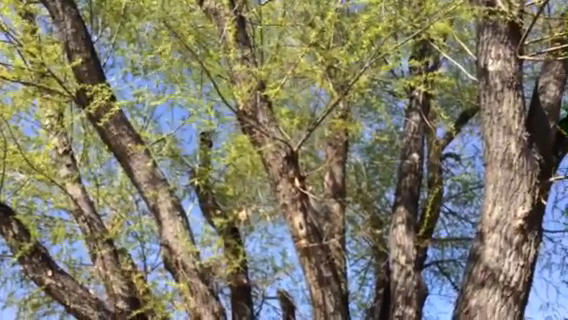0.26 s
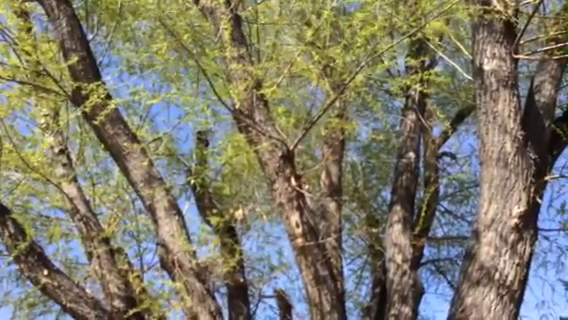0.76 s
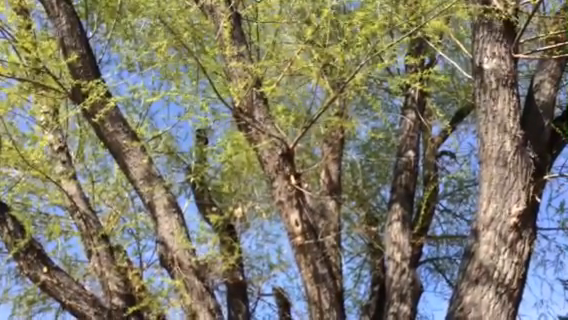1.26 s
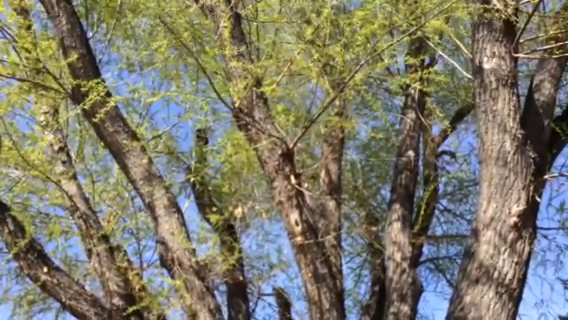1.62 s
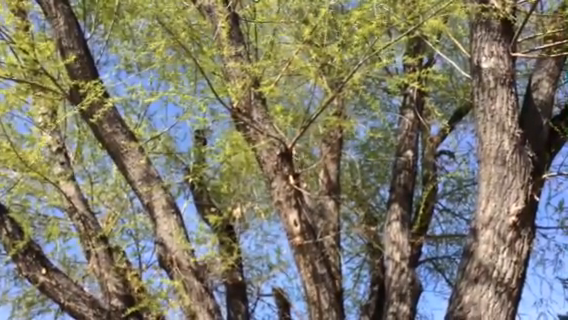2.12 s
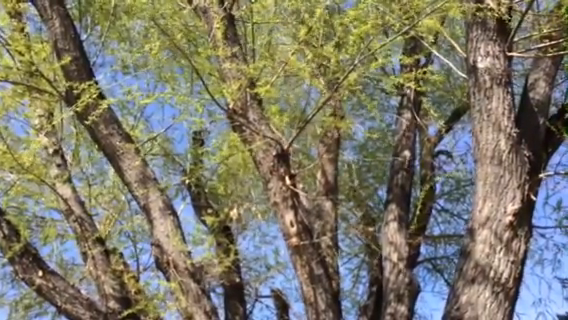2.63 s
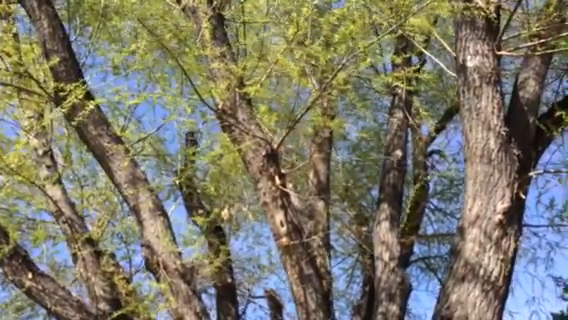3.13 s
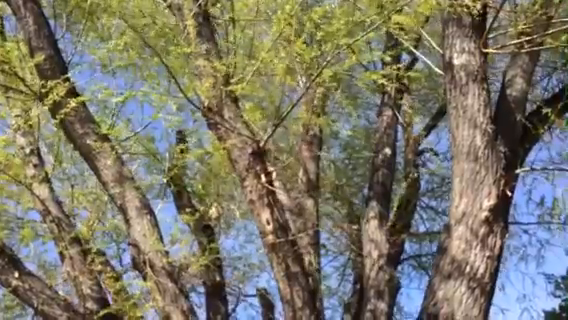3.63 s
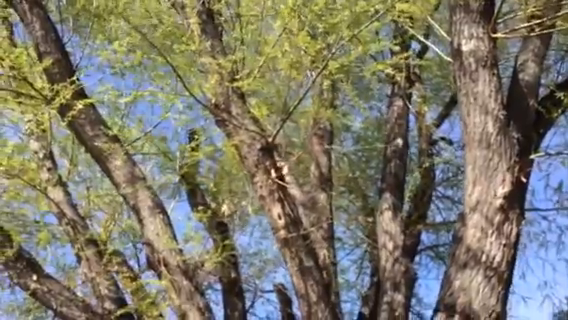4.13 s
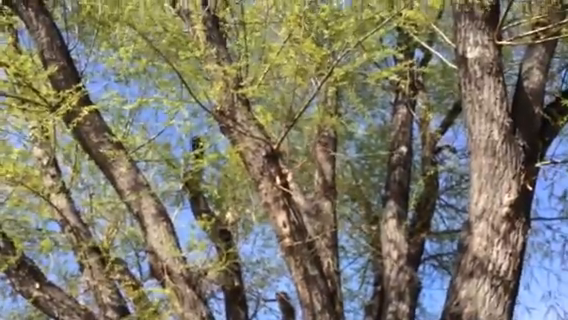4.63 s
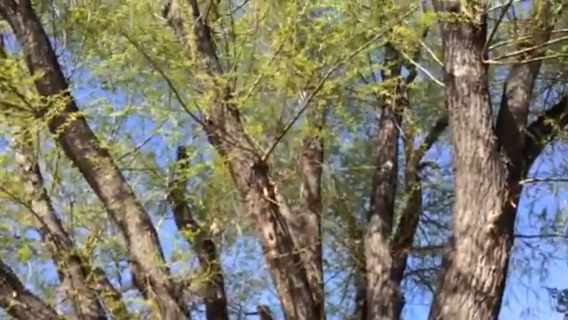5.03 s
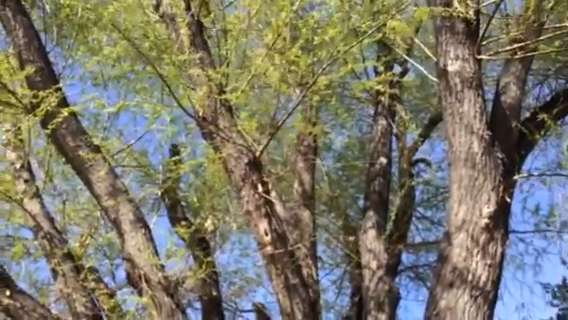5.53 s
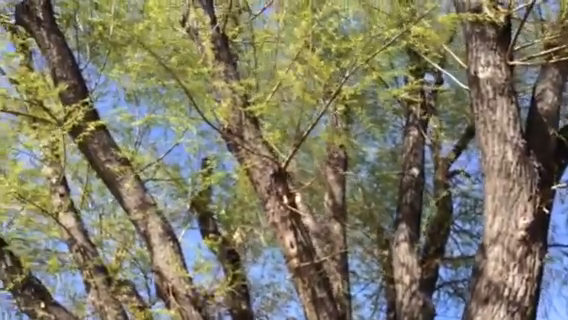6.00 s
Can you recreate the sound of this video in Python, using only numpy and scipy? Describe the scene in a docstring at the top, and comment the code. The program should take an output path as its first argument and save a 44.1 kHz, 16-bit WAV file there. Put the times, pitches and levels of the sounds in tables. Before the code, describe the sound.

A woodpecker drums one rapid, slightly slowing roll on a dead limb, with faint songbirds and distant crows in the woods.

```python
"""A spring wood over a low distant rumble. From the start, faint songbirds whistle slurred notes,
far crows caw hoarsely and twigs tick now and then. Around one second in, a small bird chips twice nearby.
At 3.3 s a woodpecker drums one slowing roll of seventeen blows: its bill rings a dead limb and crackles
the bark, and the trees echo each knock. The songbirds grow louder during the roll and sing on after it,
and two last caws close the scene."""
import sys
import numpy as np
from scipy import signal
from scipy.fft import rfft, irfft
from scipy.io import wavfile

SR = 44100
rng = np.random.default_rng(int(sys.argv[2]) if len(sys.argv) > 2 else 0)


def master_out(mix):
    """Clip the mix to full scale and print it as 16-bit PCM to the path in sys.argv[1]."""
    frames = np.transpose(np.atleast_2d(mix))
    ceiling = np.clip(frames, -1, 1)
    pcm = np.round(ceiling * 32767).astype(np.int16)
    wavfile.write(sys.argv[1], SR, pcm)


N = 276066
TIME = np.arange(N) / SR


def from_db(db):
    """Decibels to gain."""
    return 10 ** (np.asarray(db) / 20)


def rms_one(x):
    """Scale to unit power."""
    return x / np.sqrt(np.mean(x ** 2) + 1e-20)


def add(out, start_s, sound):
    """Mix a sound in at its start time."""
    at = max(round(start_s * SR), 0)
    out[at:at + len(sound)] += sound[:max(N - at, 0)]


def delayed(x, lag_s):
    """Shift a sound in time, wrapping round at the ends."""
    return np.roll(x, round(lag_s * SR))


def low_pass(x, hz):
    """Roll the treble off gently."""
    return signal.sosfilt(signal.butter(2, min(hz, .45 * SR), fs=SR, output="sos"), x)


def noise(colour, size):
    """Unit-power noise shaped by (Hz, dB) points, falling steeply beyond their ends."""
    hz, db = np.transpose(colour)
    f = np.maximum(np.fft.rfftfreq(size, 1 / SR), 1)
    skirts = np.minimum(1, np.minimum(f / hz[0], hz[-1] / f)) ** 2
    gain = from_db(np.interp(np.log(f), np.log(hz), db))
    return rms_one(irfft(rfft(rng.standard_normal(size)) * skirts * gain, size))


def drift(rate_hz, size):
    """A random wander with a spread of about 1."""
    return np.interp(np.arange(size) / SR * rate_hz, np.arange(4096), rng.standard_normal(4096))


def echoes(x, t60, edge_hz):
    """Trunks and leaves return a dying cloud of echoes."""
    t = TIME[:SR]
    cloud = low_pass(rng.standard_normal(SR), edge_hz) * from_db(-60 * t / t60)
    cloud *= 1 - np.exp(-t / 0.0027)
    return signal.fftconvolve(x, cloud / np.linalg.norm(cloud))[:N]


def woods(x, t60, wet_db, edge_hz):
    """The dry sound plus its forest reverb."""
    return x + from_db(wet_db) * echoes(x, t60, edge_hz)


def background(rumble_db, swell_db, hiss_db):
    """The bed: a lumpy far rumble, the wavering hum of far machinery and a thin, even hiss."""
    # Colours of the rumble and the hiss. Each row: frequency in Hz, relative level in dB.
    rumble_colour = [(12, -54), (20, -27), (38, -7.5), (75, -0.5), (108, -2.5), (131, -3), (163, -9),
                     (198, -7.5), (237, -18), (266, -15), (313, -18.5), (345, -19.5), (434, -21),
                     (1000, -33.5), (1300, -35.5), (2200, -120)]
    hiss_colour = [(700, 1.5), (1000, 0.5), (2000, -5), (4000, -9.5), (6500, -13.5), (10000, -17.5),
                   (15000, -20)]
    # Machinery tones. Each row: frequency in Hz, level in dB.
    hum_tones = [(51, -68), (76, -70), (139, -64.5)]
    bed = from_db(rumble_db + swell_db * drift(15, N)) * noise(rumble_colour, N)
    for hz, db in hum_tones:
        level = from_db(db + 0.76 * drift(3.3, N))
        bed += level * np.sqrt(2) * np.sin(2 * np.pi * hz * TIME + 1.18 * drift(6, N))
    return bed + from_db(hiss_db) * noise(hiss_colour, N)


def twigs(gain_db, t60):
    """Twigs tick: short, dry bursts of noise."""
    # Each row: start in seconds, relative level in dB, brightness in Hz (a third of the cutoff).
    ticks = [(0.1344, -80, 1590), (0.5187, -50.5, 1270), (0.611, -53.5, 2720), (0.6319, -53.5, 4000),
             (0.9116, -55, 1290), (1.5744, -72, 1020), (2.3264, -57, 1440), (2.5277, -61, 1000),
             (3.086, -61, 1620)]
    # Colour of a tick. Each row: frequency in Hz, relative level in dB.
    tick_colour = [(400, -12), (1200, -5), (2500, -0.5), (5000, -4), (8000, -1.5), (14000, -19)]
    out, t = np.zeros(N), TIME[:SR // 10]
    for start, db, bright_hz in ticks:
        snap = rms_one(low_pass(noise(tick_colour, len(t)), 3 * bright_hz))
        add(out, start, from_db(db + gain_db - 60 * t / t60) * snap)
    return woods(out, t60=0.19, wet_db=-7, edge_hz=8600)


def crows(sag, throat_width_hz, upper_hz, upper_db):
    """Jittered harmonics under a throat resonance; a harsh caw sinks at its end; distance smears it."""
    # Each row: start and length in seconds, pitch and throat resonance in Hz, relative level in dB,
    # harshness from 0 to 1.
    caws = [(0, 0.1, 440, 1310, -68, 0.53), (0.716, 0.16, 422, 1275, -63.5, 0.61),
            (0.778, 0.18, 439.6, 1260, -64.5, 0.86), (2.905, 0.17, 503, 1430, -66.5, 0.8),
            (4.719, 0.19, 532, 1484, -59.5, 0.75), (4.904, .16, 530, 1650, -72.5, .65),
            (5.359, 0.17, 420, 1560, -57, .88), (5.795, 0.175, 424, 1600, -56.5, 0.88)]
    out = np.zeros(N)
    harmonic = np.arange(1, 14)[:, None]
    for start, length, pitch_hz, throat_hz, db, harsh in caws:
        progress = np.linspace(0, 1, int(length * SR))
        jitter = .065 * harsh * drift(800, len(progress))
        bend = 1 - sag * harsh ** 2 * (1 - np.cos(np.pi * (progress - .3)))
        f0 = pitch_hz * (bend + jitter)
        throat = 1 / (1 + ((harmonic * f0 - throat_hz * bend) / throat_width_hz) ** 2)
        throat += harsh * from_db(upper_db) / (1 + ((harmonic * f0 - upper_hz) / 1100) ** 2)
        voice = np.sum(throat * np.sin(2 * np.pi * harmonic * np.cumsum(f0) / SR), axis=0)
        voice *= 1 + harsh * drift(450, len(voice))   # uneven throat pulses make it hoarse
        add(out, start, from_db(db - 2.5) * signal.windows.tukey(len(voice), .5) * rms_one(voice))
    return woods(out, t60=1.0, wet_db=-3.5, edge_hz=7200)


def whistle(hz, waver):
    """A nearly pure bird tone of unit power, its pitch trembling."""
    wavering_hz = hz * (1 + waver * drift(730.5, len(hz)))
    return np.sqrt(2) * np.sin(2 * np.pi * np.cumsum(wavering_hz) / SR)


def faint_slurs(count, length_s, low_hz, high_hz, semitones, db):
    """Notes of the farthest birds, at random moments and pitches."""
    return [(when * N / SR, length_s, low_hz + height * (high_hz - low_hz), semitones, db)
            for when, height in rng.random((count, 2))]


def songbirds(flutter_db, half_wet_db):
    """Whistles glide and flutter; those fainter than half_wet_db are far off and mostly echo."""
    # Arched peeps, dipping slurs and slides. Each row: start and length in seconds, pitch in Hz
    # (an arch's top, near a dip's bottom, a slide's start), sweep in semitones, level in dB.
    arches = [(0.865, .12, 2453, 0.32, -78.5), (1.851, 0.074, 3270, 1.6, -70.5),
              (1.865, .05, 6300, 0.92, -84), (2.34, .05, 3140, 0.46, -76), (2.57, 0.051, 6300, .9, -70.5),
              (2.576, 0.048, 3200, 1, -75), (2.728, .15, 3420, 4.4, -77), (4.114, .076, 4560, 5.4, -61.5),
              (4.457, 0.042, 3270, 1.2, -60), (4.706, .085, 4610, 5.9, -63), (4.844, 0.053, 3360, 1.3, -72),
              (4.91, 0.026, 4150, .7, -65.5), (5.215, 0.17, 3340, 5.2, -72.5)]
    dips = [(4.252, 0.082, 2640, 7.3, -61.5), (4.554, 0.081, 2523, 9.9, -64), (4.974, .064, 2440, 8, -65.5)]
    slides = [(0, 0.035, 4040, 2.3, -74), (0.036, .07, 3150, -4.5, -84), (.225, 0.022, 2680, -5, -76),
              (0.334, 0.073, 3020, 2.8, -80), (0.432, 0.055, 6270, -5, -76.5),
              (.465, 0.062, 6100, -8, -73.5), (1.632, 0.066, 4600, -9, -76),
              (1.785, 0.019, 5450, -4.5, -75), (1.823, 0.054, 4390, -4, -75),
              (2.005, 0.021, 4500, -6, -77.5), (2.04, 0.075, 4100, -4, -73.5),
              (2.122, 0.042, 3500, -4.5, -74), (2.315, .04, 4560, -5, -76), (2.505, .08, 4370, -4, -75),
              (3.109, 0.085, 4200, -4.5, -77), (3.652, 0.048, 4830, -5, -64),
              (3.819, 0.056, 3310, 4.5, -64), (4.031, 0.029, 3580, 2, -67), (4.876, .036, 4600, -4.3, -63),
              (5.032, 0.028, 3800, -7, -65.5)]
    faint = faint_slurs(count=12, length_s=0.075, low_hz=2380, high_hz=4200, semitones=-3.5, db=-80.5)
    # Pitch contours: share of the sweep at even steps through the note.
    arch, dip, slide = (-.65, -.22, 0, -.28, -1.1), (0.97, 0.48, 0.057, .4, 0.71), (0, .24, .55, 1)
    direct, scattered = np.zeros(N), np.zeros(N)
    for contour, notes in ((arch, arches), (dip, dips), (slide, slides + faint)):
        glide = np.polyfit(np.linspace(0, 1, len(contour)), contour, len(contour) - 1)
        for start, length, pitch_hz, sweep, db in notes:
            progress = np.linspace(0, 1, int(length * SR))
            hz = pitch_hz * 2 ** (sweep * np.polyval(glide, progress) / 12)
            level = from_db(db + flutter_db * drift(158, len(hz)))
            note = level * signal.windows.tukey(len(hz), .4) * whistle(hz, waver=0.013)
            wet = 1 / (1 + from_db(db - half_wet_db))
            add(direct, start, np.sqrt(1 - wet) * note)
            add(scattered, start, np.sqrt(wet) * note)
    slapback = from_db(-13.5) * delayed(direct, lag_s=.036)   # off one trunk
    return direct + slapback + echoes(scattered, t60=0.4, edge_hz=13000)


def chipping_bird(rasp_db, rasp_s):
    """Two sharp chips, each opening with a rasp in the throat, thrown back by nearby trunks."""
    # Each row: time in seconds, base level in dB.
    chips = [(0.702, -47), (1.276, -45.5)]
    # One chip: a thin lead-in, a climb and a sudden drop.
    # Each row: seconds from the chip's time, pitch in Hz, relative level in dB.
    chip_shape = [(-.035, 4870, -28), (-.007, 5800, -22), (0, 3516, -25), (.006, 4300, -3),
                  (0.023, 4850, -10.5), (.028, 5410, -14), (.031, 3840, -5), (.037, 3757, -1.5),
                  (.05, 3250, -17)]
    # Colour of the rasp. Each row: frequency in Hz, relative level in dB.
    rasp_colour = [(4800, -3), (5900, 8), (6800, -4.5), (8200, -7), (11500, -17)]
    # Slapbacks off the trunks. Each row: delay in seconds, gain in dB.
    trunks = [(.025, -9), (.066, -13)]
    times, hz, db = np.transpose(chip_shape)
    t = np.arange(times[0], times[-1], 1 / SR)
    rasp_swell = np.hanning(int(rasp_s * SR))
    out = np.zeros(N)
    for when, chip_db in chips:
        tone = whistle(np.interp(t, times, hz), waver=.025)
        rasp = rasp_swell * noise(rasp_colour, len(rasp_swell))
        add(out, when + times[0], from_db(chip_db + np.interp(t, times, db)) * tone)
        add(out, when + times[0], from_db(chip_db + rasp_db) * rasp)
    slapbacks = sum(from_db(gain_db) * delayed(out, lag) for lag, gain_db in trunks)
    return woods(out + slapbacks, t60=0.36, wet_db=-8, edge_hz=3500)


def roll(start_s, blows, first_gap_s, tired_gap_s, tiring_blows):
    """Time and relative dB of each blow: the bill starts fast and tires towards a slower beat."""
    blow = np.arange(blows)
    gaps = tired_gap_s + (first_gap_s - tired_gap_s) * np.exp(-blow / tiring_blows)
    force_db = -11 / (1 + blow) ** 1.12   # the force builds over the first blows
    force_db[-1] -= 1.8   # and eases on the last
    return zip(start_s + np.cumsum(gaps) - gaps, force_db)


def woodpecker(ring_db, scatter_db, scatter_t60, bark_db, bark_t60, scuff_db, scuff_s):
    """Every blow rings the same limb and arrives by the same paths; the bark crackles anew each time."""
    # Modes of the dead limb. Each row: frequency in Hz, relative level in dB, t60 in seconds.
    limb_modes = [(417, -25.7, 0.0265), (656, -19.8, 0.0255), (689, -6.8, 0.0085), (896, -29.5, 0.0347),
                  (960, -12.5, 0.0166), (1288, 1.2, 0.0081), (1320, -17.9, 0.1223), (1559, -20.4, 0.0128),
                  (1986, -12.4, 0.0082), (2815, -14.5, 0.0081), (3506, -22, 0.0072), (4079, -23, 0.0048),
                  (6012, -27.9, 0.0086), (6586, -26.2, 0.005), (8124, -27.8, 0.0091), (10650, -16, 0.0005)]
    # Paths from limb to listener; those through the wood outrun the air.
    # Each row: delay in seconds, gain in dB, treble cutoff in Hz.
    paths = [(-0.00636, -3.5, 1080.0), (-0.00479, -5.2, 650.0), (-0.00277, 16.3, 260.0),
             (-0.00047, -5.1, 3110.0), (0.0001, 2.4, 6500), (0.00307, -6.6, 1200.0),
             (0.00775, -15.4, 6500.0), (0.00793, -16.6, 2940.0), (0.01022, -9.8, 2640.0),
             (0.01421, -17.9, 4670.0), (0.01959, -4.4, 390.0), (0.0278, -20.3, 790.0),
             (0.03153, -20.4, 1570.0), (0.0635, -19.5, 3000)]
    # Colours of the scatter off branches, the splintery bark and the bill's scuff.
    # Each row: frequency in Hz, relative level in dB.
    scatter_colour = [(300, -2.5), (500, -7), (650, -20), (900, -8), (1280, 6), (1750, -3.5), (2300, -11.5),
                      (3000, -9.5), (4200, -17.5), (5000, -33), (6000, -26), (8000, -32), (14000, -43)]
    bark_colour = [(500, 8), (1700, 0.5), (2300, -7), (3000, -6), (4200, -22), (5000, -37), (6000, -17),
                   (8000, -19), (14000, -33)]
    scuff_colour = [(1300, 4), (2000, -4), (2600, 1), (3100, 0), (3800, -22), (7000, -28), (12000, -44)]
    t = TIME[:SR // 2]
    hz, mode_db, t60 = np.transpose(limb_modes)[:, :, None]
    polarity = (-1) ** np.arange(len(limb_modes))[:, None]
    modes = polarity * from_db(mode_db - 60 * t / t60) * np.sin(2 * np.pi * hz * t)
    branches = noise(scatter_colour, len(t)) * from_db(scatter_db - 60 * t / scatter_t60)
    scuff_swell = signal.windows.tukey(int(scuff_s * SR), .5)
    limb, scattered = np.zeros(N), np.zeros(N)
    blows = roll(start_s=3.3361, blows=17, first_gap_s=.060364, tired_gap_s=.082441, tiring_blows=12.303)
    for start, force_db in blows:
        # The bill lands a little differently each time.
        ring = from_db(.6 * rng.standard_normal(len(limb_modes))) @ modes
        # It dents the wood, which rounds the click; softer blows are duller.
        dent_hz = 7600 * 2 ** (0.09 * force_db + 0.13 * rng.standard_normal())
        add(limb, start, from_db(ring_db + force_db) * low_pass(ring, dent_hz))
        crackle = noise(bark_colour, len(t)) * from_db(bark_db - 60 * t / bark_t60)
        add(scattered, start, from_db(force_db) * (branches + crackle))
        # It scuffs loose bark just before it lands.
        scuff = scuff_swell * noise(scuff_colour, len(scuff_swell))
        add(scattered, start - scuff_s, from_db(force_db + scuff_db) * scuff)
    arrivals = sum(from_db(db) * low_pass(delayed(limb, lag), edge_hz) for lag, db, edge_hz in paths)
    low_cut = signal.butter(2, 258, "high", fs=SR, output="sos")   # the knocks carry little bass
    knocks = signal.sosfilt(low_cut, arrivals + scattered)
    return woods(knocks, t60=0.94, wet_db=-21, edge_hz=12000)


def scene():
    """The mono mix of the wood, with the drumming up front."""
    drumming = woodpecker(ring_db=-19.5, scatter_db=-43.5, scatter_t60=0.14,
                          bark_db=-40.5, bark_t60=0.013, scuff_db=-50.5, scuff_s=.013)
    chips = chipping_bird(rasp_db=-19.0, rasp_s=0.057)
    song = songbirds(flutter_db=4.5, half_wet_db=-83.5)
    caws = crows(sag=.15, throat_width_hz=213, upper_hz=3930, upper_db=-21.5)
    bed = background(rumble_db=-57.0, swell_db=2.0, hiss_db=-71.0)
    ticks = twigs(gain_db=-4, t60=0.029)
    return (bed + ticks + caws + song + chips + drumming)[None]


def record(dry):
    """The microphone loses the deepest bass; the top is cut steeply."""
    low_cut = signal.butter(2, 32, "high", fs=SR, output="sos")
    high_cut = signal.ellip(10, .1, 70, 15350, fs=SR, output="sos")
    return signal.sosfilt(high_cut, signal.sosfilt(low_cut, dry))


dry = scene()
out = record(dry)
master_out(out)
```